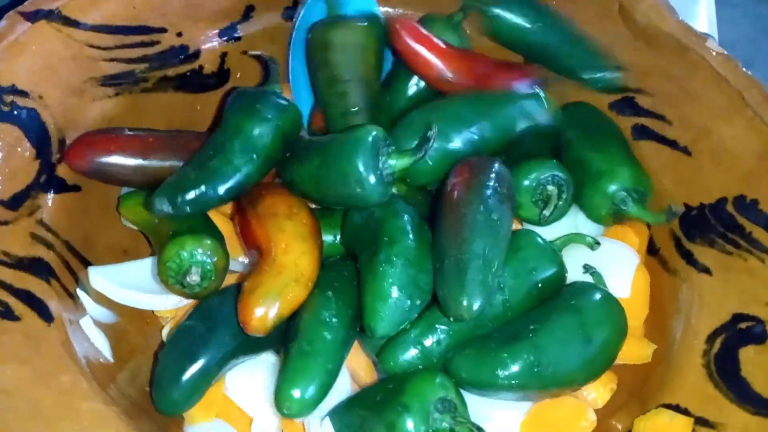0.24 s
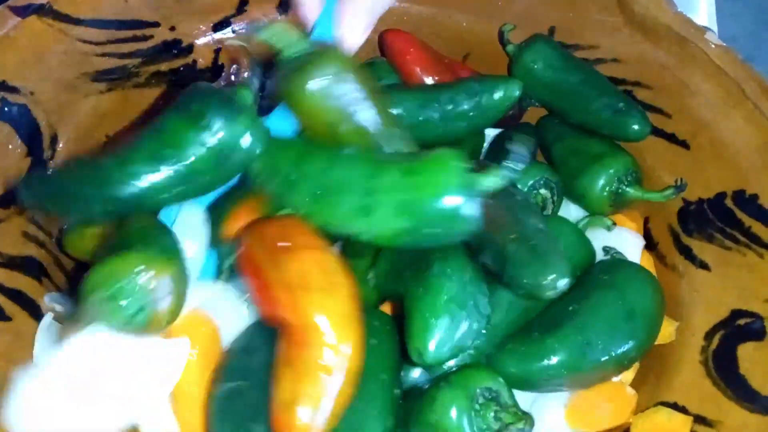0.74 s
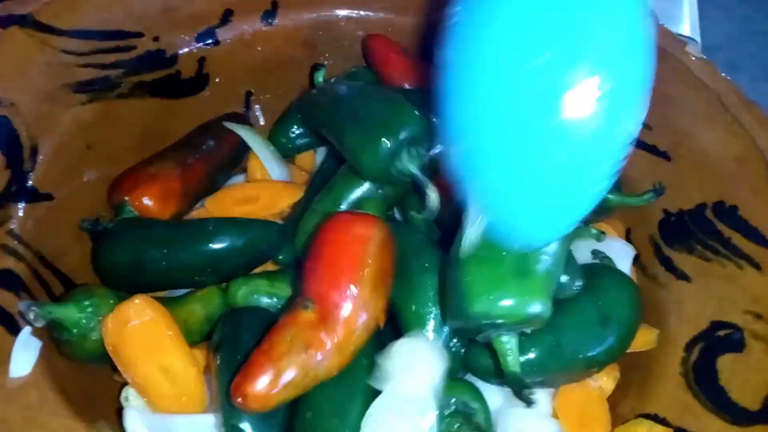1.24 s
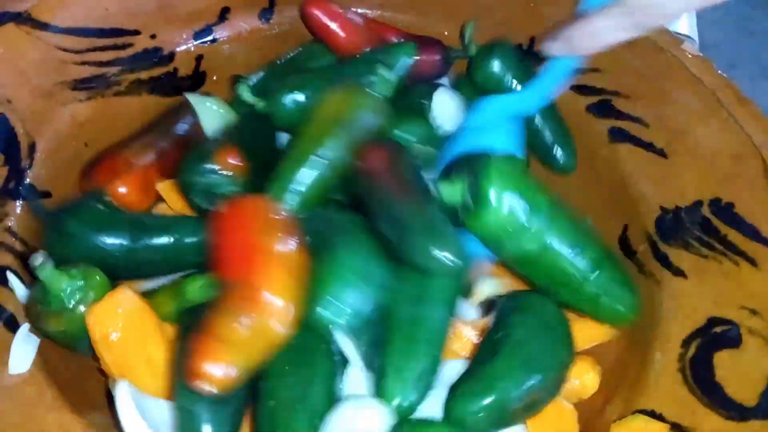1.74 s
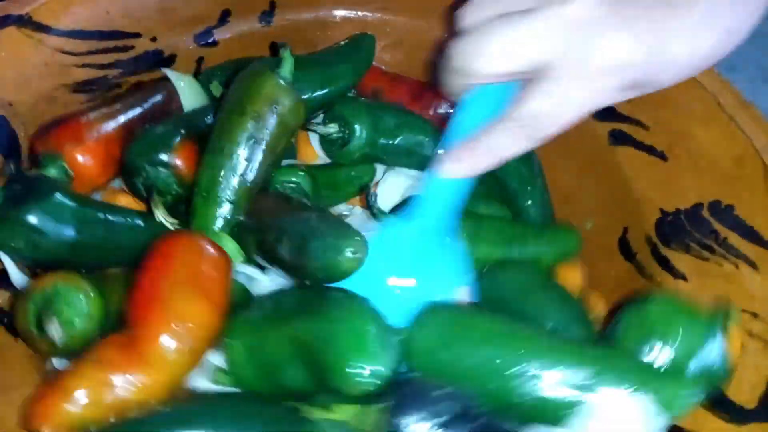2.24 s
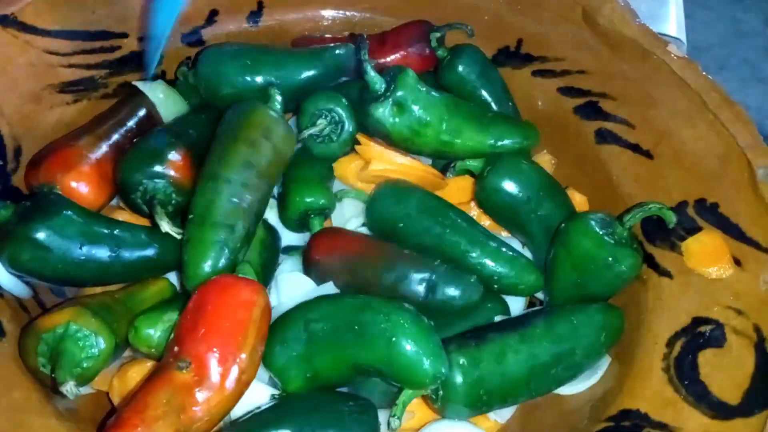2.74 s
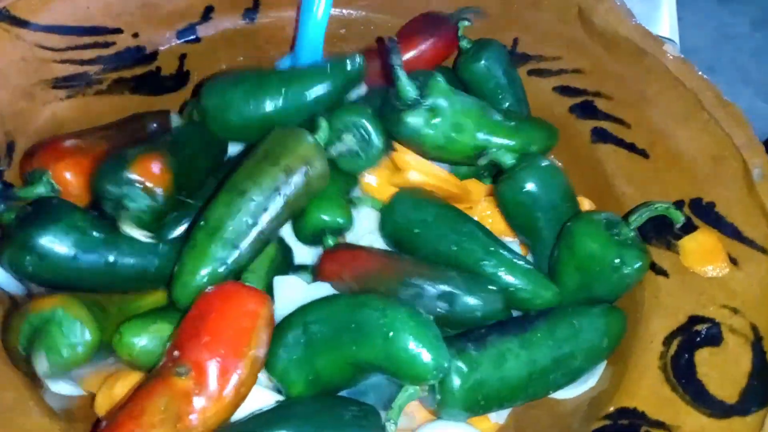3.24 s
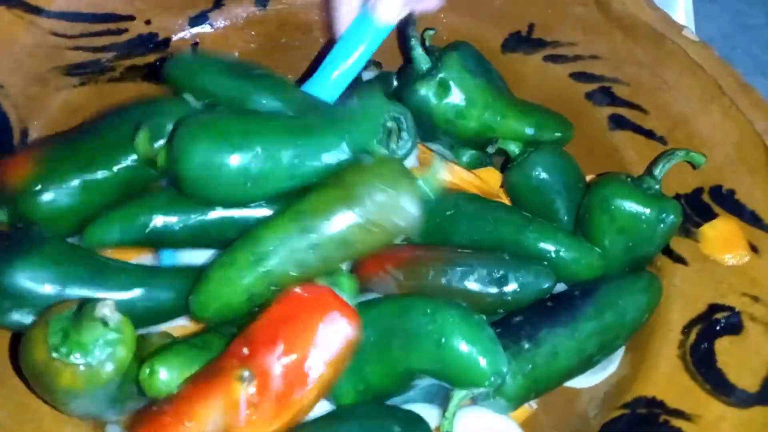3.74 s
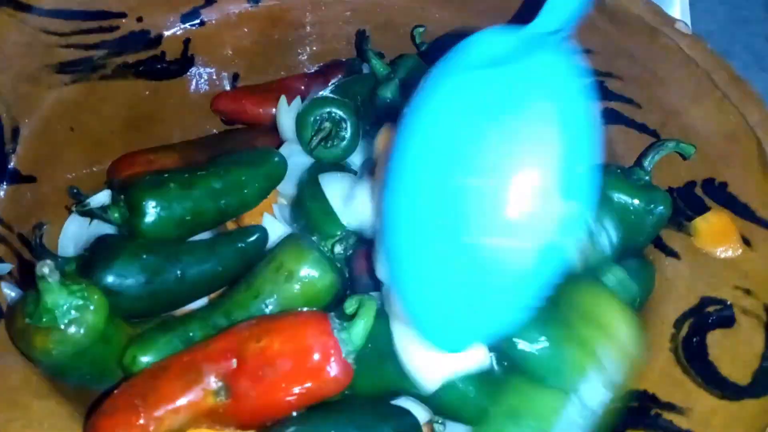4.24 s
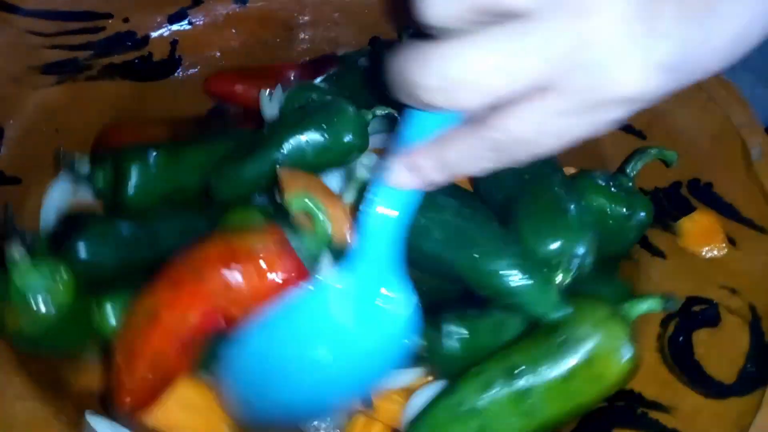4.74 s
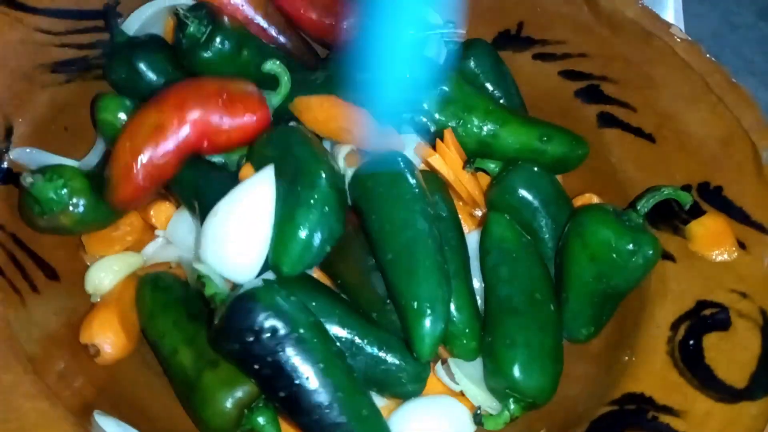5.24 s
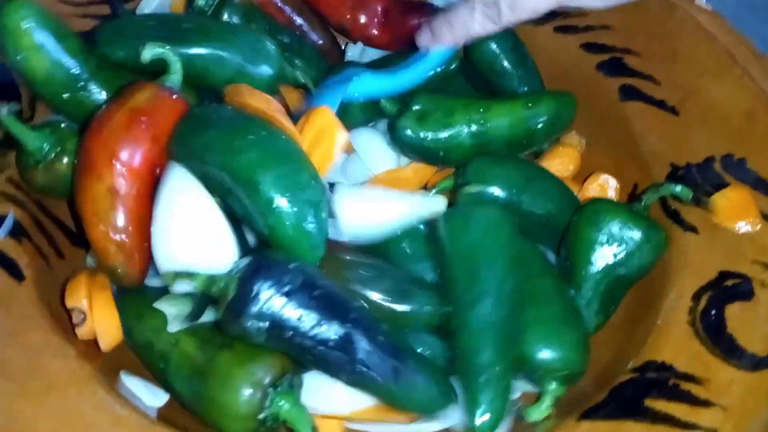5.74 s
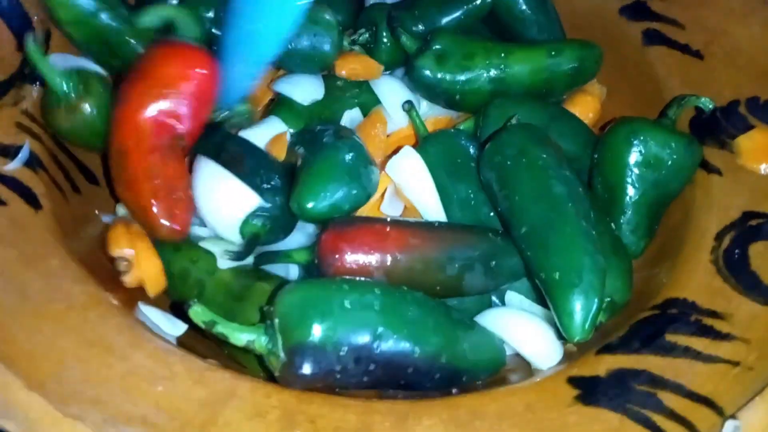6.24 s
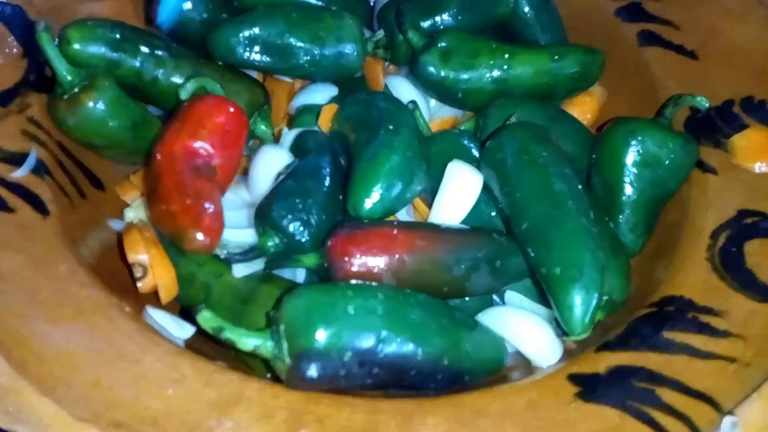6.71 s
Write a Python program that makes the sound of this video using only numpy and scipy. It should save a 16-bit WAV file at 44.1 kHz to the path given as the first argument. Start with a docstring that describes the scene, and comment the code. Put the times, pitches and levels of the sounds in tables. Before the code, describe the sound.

Peppers and onions sizzle gently in a clay pot while a plastic spoon knocks and scrapes the wall, with oil spitting close by.

```python
"""Vegetables frying in a clay pot

Whole peppers, onion and carrot sizzle gently in a wide clay pot on a kitchen stove, close to the microphone.
Frying and burner are random impulses and noise through coloured filters; steam bubbles are decaying sines.
Oil spits, bumps and thuds are short decaying bursts. A plastic spoon knocks on the clay and scrapes along it
in stick-slip strokes: trains of random impulses exciting the pot's resonances, with brief squeaks of one pitch."""
import sys
import numpy as np
from scipy import signal
from scipy.fft import rfft, irfft, next_fast_len
from scipy.io import wavfile
from scipy.ndimage import uniform_filter1d, map_coordinates

SR = 44100
rng = np.random.default_rng(int(sys.argv[2]) if len(sys.argv) > 2 else 0)


def output_pcm(signal):
    """Save a mono or channel-first signal as 16-bit PCM at the path in sys.argv[1].

    Samples are clipped to [-1, 1] before scaling.
    """
    pcm = np.clip(np.atleast_2d(signal).T, -1, 1) * 32767
    wavfile.write(sys.argv[1], SR, np.round(pcm).astype(np.int16))


N = 307597  # length in samples

# Reverberation of the kitchen. Each row: frequency in Hz, t60 in seconds.
KITCHEN_DECAY = [(150, 0.16), (2000, 0.35), (14000, 0.52)]
# Colours of the burner and pot rumble, the tumbling vegetables, the boiling and the fine spray.
# Each row: frequency in Hz, relative gain in dB.
BURNER_COLOUR = [(15, -59), (25, -34), (43, -5.5), (75, -7.5), (108, 0.5), (156, -5.5), (188, -14.5),
                 (243, -4), (299, -12.5), (344, -12.5), (400, -29.5), (520, -12.5), (880, -120)]
TUMBLE_COLOUR = [(150, -35), (280, -2), (420, -1.5), (850, 0.5), (1300, -0.5), (2500, -23.5)]
SIZZLE_COLOUR = [(300, -25), (600, -12), (950, -4.5), (1300, -3), (1750, 1), (2300, 4), (2750, 2.5),
                 (3700, -6.5), (4600, -12.5), (5700, -4.5), (6500, -5), (7800, -21.5), (10000, -53)]
SPRAY_COLOUR = [(4000, -64), (6300, 1), (8000, -9.5), (9800, 0), (11500, -1.5), (13500, -6), (15000, 0),
                (16000, 10)]
# The heap turns over and rocks the pot.
# Each row: time of its height in seconds, half length in seconds, sliding in dB, rumble in dB.
TURNS = [(0.373, 0.14, -40.5, -39.5), (0.944, 0.25, -47.5, -48), (1.705, 0.11, -35.5, -42.5),
         (2.2, 0.44, -38, -57), (3.11, .1, -40, -62), (4.21, 0.37, -50, -49), (4.924, 0.11, -36.5, -52),
         (5.857, 0.16, -39.5, -60), (6.902, 0.056, -44, -42)]
# The frying flares up after each stir and calms down again.
# Each row: time in seconds, sizzle level in dB, fine spray level in dB.
FRYING_LEVELS = [(0.0, -40, -38), (0.5, -31.5, -33), (0.8, -36.5, -33.5), (1.55, -40.5, -41),
                 (2.1, -40, -34.5), (2.42, -34.5, -28.5), (2.88, -41, -38.5), (3.32, -33.5, -30),
                 (3.69, -41.5, -39.5), (4.19, -39, -40.5), (4.62, -41.5, -45), (4.99, -34.5, -34),
                 (5.3, -39.5, -36.5), (5.65, -39, -35), (6.2, -41, -39), (6.6, -38, -38), (6.97, -41, -36)]
# Dull thuds of the heavy pot. Each row: start in seconds, level of the low push in dB, frequency in Hz, t60 in seconds.
THUDS = [(1.58, -15, 167, 0.022), (2.123, -12, 102, 0.02)]
# Peppers drop on each other and on the pot. Each row: start in seconds, loudest level in dB, pitch in Hz.
BUMPS = [(0.235, -34, 729), (1.401, -41, 899), (4.003, -34.5, 676), (4.313, -36.5, 830), (5.104, -37, 755),
         (6.046, -31, 590)]
# The loudest spits of oil and snaps of pepper skin.
# Each row: start in seconds, loudest level in dB, centre in Hz.
LOUD_SPITS = [(0.135, -31, 3180), (0.557, -19.5, 5300), (1.068, -25.5, 6000), (1.148, -24, 2180),
              (1.172, -26, 2490), (1.914, -23, 14500), (2.124, -21.5, 12500), (2.251, -23, 13000),
              (3.778, -29, 2470), (4.024, -30, 13460), (5.143, -25.5, 3000), (5.162, -21.5, 2530),
              (6.096, -30, 9800), (6.477, -27.5, 3450), (6.535, -23.5, 1690), (6.637, -33, 10900),
              (6.934, -24.5, 3400)]
# Resonances of the clay pot. Each row: frequency in Hz, half width at half amplitude in Hz, relative level in dB.
POT_MODES = [(477, 48, -10), (716.7, 19, -1.5), (855, 43, 1.5), (935.6, 32, 1), (1113, 15, 0),
             (1395, 93, -8), (1635, 38, 7), (1811, 68, 4.5), (2120, 260, 0), (2282, 7.7, 5),
             (2484, 52, -0.5), (2620, 144, -2), (3152, 21, -7), (3520, 71, -12), (3750, 45, -10),
             (5470, 97, -13.5), (6380, 270, -17.5), (6970, 150, -22.5), (9090, 200, -18),
             (11700, 210, -34.5), (11500, 450, -22), (13900, 290, -26.5)]
# The dense, well damped response between those modes. Each row: frequency in Hz, relative gain in dB.
CLAY_RESPONSE = [(40, -37), (120, -40), (400, -20.5), (700, -14), (1250, -9.5), (2800, -7.5), (3900, -19),
                 (6300, -16.5), (8000, -27.5), (10500, -19), (13600, -26), (15500, -12.5)]
# The spoon's edge squeaks; the first row is instead a high ring of the hard knock at 1.578 s. Each row: start
# in seconds, length in seconds, pitch in Hz, peak level in dB.
SQUEAKS = [(1.574, 0.019, 9240, -24), (1.591, 0.089, 3570, -22.5), (2.904, 0.014, 10600, -17.5),
           (2.906, 0.059, 9200, -27), (2.898, 0.041, 15000, -24), (2.994, 0.081, 8740, -28),
           (3.028, 0.054, 14700, -23)]
# The spoon strikes the clay; depth and grit are relative to the middle register. Each row: start in seconds,
# loudest level in dB, depth in dB, grit in dB, chatter t60 in seconds, favoured frequency in Hz.
KNOCKS = [(0.305, -5, -16, -8, 0.016, 1510), (0.391, -12, -15, -11, 0.014, 2580),
          (0.618, -14, -11.5, -1, 0.04, 2860), (1.578, 0, -12.5, -14, 0.049, 2360),
          (1.763, -5, -14, -12, 0.051, 2180), (2.053, -21.5, 11, -21, .03, 900),
          (2.228, -26, -6, 3, .03, 1850), (2.315, -10, -10.5, -18.5, 0.071, 1900),
          (2.464, -18, -3, -15, .06, 1630), (2.905, -9.5, -13, -2, 0.072, 2660),
          (3.061, -13.5, -4, 3.5, 0.023, 1700), (3.221, -23.5, -11, -10, 0.027, 1660),
          (5.641, -7.5, 5, -14.5, 0.09, 1030), (5.665, -15.5, 14, -29, 0.027, 850),
          (5.778, -9, 5.5, -17, 0.044, 1630)]
# Strokes of the spoon along the clay; the place of contact favours one resonance.
# Each row: start in seconds, swell in seconds, release in seconds, peak force in dB,
# depth and grit in dB relative to the middle register, favoured frequency in Hz, its boost in dB.
STROKES = [(0.315, 0.1, 0.061, -17.5, -9, -5.5, 2666, 16.5), (0.455, 0.022, 0.23, -24.5, -7.5, -7, 1600, 5),
           (0.62, 0.017, 0.056, -20, -11, -1, 2820, 13), (1.585, 0.0037, 0.15, -13, -5, -17.5, 966, 15),
           (1.68, 0.034, 0.056, -29.5, -23, 8, 2300, 15), (1.773, 0.11, 0.025, -12.5, -3.5, -8, 1600, 9),
           (1.93, 0.062, 0.066, -22.5, 3.5, -4.5, 1135, 10),
           (2.04, 0.049, 0.0078, -25.5, -1.5, -4, 1110, 7),
           (2.14, 0.035, 0.017, -25.5, -2.5, -13, 2330, 10), (2.225, 0.034, 0.044, -26, -4.5, -11, 1850, 1),
           (2.335, .088, 0.029, -15.5, -10, -11, 2140, 8.5),
           (2.464, 0.0058, 0.042, -17, -6.5, -15, 1710, 13),
           (2.905, 0.036, 0.044, -18.5, -8, -6.5, 2590, 14),
           (2.965, 0.085, 0.058, -18.5, -12.5, -3, 2060, 8), (3.214, 0.055, 0.06, -20, -12, -9.5, 1650, 7),
           (3.33, 0.071, 0.4, -38, -1.5, -11, 850, 7), (4.816, 0.024, 0.082, -25, -12, -5, 690, 18),
           (4.89, 0.029, 0.12, -25, -6.5, -8, 1850, 3), (5.659, 0.0054, 0.063, -20, 2, -13, 850, -3),
           (5.78, 0.0035, 0.052, -16.5, -8, -24, 1590, 17), (5.816, 0.13, 0.033, -19.5, 5, -10, 845, 7.5)]

SWELL_DB, RELEASE_DB = 10.5, 20.5  # rise of force as the spoon digs in, fall as it lifts
SETTLING_DB, BURNER_DB = -53.5, -49  # the vegetables at rest; the steady flame
SPITS_PER_S, SMALL_SPIT_DB, SMALL_SPIT_HZ = 4, -35, 5600  # small spits: rate, middle level, middle pitch
TOP_HZ = 15900  # band limit


def amp(db):
    """Logarithmic level: decibels to amplitude gain."""
    return 10 ** (np.asarray(db) / 20)


def unit(x):
    """Normalisation by mean power: x at rms 1."""
    return x / np.sqrt(np.mean(x ** 2) + 1e-20)


def crest(x, size=128):
    """Normalisation by peak short-time power: the loudest few milliseconds of x at rms 1."""
    power = uniform_filter1d(x ** 2, size, mode="constant")
    return x / np.sqrt(power.max() + 1e-20)


def along(points, hz):
    """Logarithmic frequency scale: values read between (Hz, value) points."""
    f, value = np.transpose(points)
    return np.interp(np.log(hz + 1), np.log(f + 1), value)


def seconds(length):
    """Sampled time: an axis of the given length in seconds."""
    return np.arange(int(length * SR)) / SR


def add(track, s, x):
    """Superposition: mix x into the track at time s."""
    part = track[max(round(s * SR), 0):][:len(x)]
    part += x[:len(part)]


def wobble(rate, n):
    """Slow random modulation: a smooth curve through rate random knots a second."""
    knots = rng.standard_normal(int(n * rate / SR) + 4)
    return map_coordinates(knots, [np.arange(n) * rate / SR], order=2)


def filtered(x, gain):
    """Zero-phase filtering: the spectrum is multiplied by a real gain of frequency."""
    m = next_fast_len(len(x) + 8192)
    return irfft(rfft(x, m) * gain(np.fft.rfftfreq(m, 1 / SR)), m)[:len(x)]


def ring(x, gain, size=8192):
    """Minimum-phase filtering: a folded cepstrum gives the causal response with this gain of frequency."""
    cepstrum = irfft(np.log(gain(np.fft.rfftfreq(size, 1 / SR)) + 1e-6))
    cepstrum[1:size // 2] *= 2
    cepstrum[size // 2 + 1:] = 0
    response = irfft(np.exp(rfft(cepstrum)))[:size // 2]
    return signal.fftconvolve(x, response)[:len(x)]


def crackle(n, rate, spread_db):
    """Shot noise: random impulses, on average rate a second, with sizes spread in dB; rms 1."""
    size = amp(spread_db * np.minimum(rng.standard_normal(n), 2.5))
    sign = rng.choice([-1, 1], n)
    present = rng.random(n) < rate / SR
    return unit(size * sign * present)


def grains(spectrum, rate, spread_db, hiss_db, flutter_db, flutter_rate):
    """Clumped shot noise: countless tiny bursts over a hiss, fluttering in level and coloured; rms 1."""
    bursts = crackle(N, rate, spread_db) + amp(hiss_db) * rng.standard_normal(N)
    fluttering = bursts * amp(flutter_db * wobble(flutter_rate, N))
    return unit(ring(fluttering, lambda f: amp(along(spectrum, f))))


def kitchen(x, delay=0.006):
    """Reverberation: convolution with a noise tail that decays later in the treble than in the middle."""
    hz, t, z = signal.stft(rng.standard_normal(SR // 2), SR, nperseg=256)
    decay = amp(-60 * t / along(KITCHEN_DECAY, hz)[:, None])
    tail = signal.istft(z * decay, SR, nperseg=256)[1]
    delayed = np.pad(x, (int(delay * SR), 0))
    return signal.fftconvolve(delayed, tail / np.linalg.norm(tail))[:N]


def heap_motion(resting_db, heights_db):
    """Addition of powers: each turn of the heap swells and dies away over the resting level; a gain."""
    t = np.arange(N) / SR
    power = amp(resting_db) ** 2
    for (s, half_length, *_), height_db in zip(TURNS, heights_db):
        motion = np.exp(-((t - s) / half_length) ** 2)
        power = power + (amp(height_db) * motion) ** 2
    return np.sqrt(power)


def burner():
    """Low-frequency noise: the steady flame, with the rumble of the pot rocked by each turn of the heap."""
    rumble = heap_motion(BURNER_DB, [row[3] for row in TURNS])
    return rumble * grains(BURNER_COLOUR, rate=300, spread_db=3.5, hiss_db=1, flutter_db=3, flutter_rate=11.0)


def tumbling():
    """Friction noise: wet vegetables slide over each other, loudest as the heap turns."""
    slide = heap_motion(SETTLING_DB, [row[2] for row in TURNS])
    return slide * grains(TUMBLE_COLOUR, rate=250, spread_db=8.5, hiss_db=-0.5, flutter_db=4.5, flutter_rate=25)


def bubbles(rate=90, centre_hz=3800, octaves=0.79, cycles=9, spread_db=0.5):
    """Damped bubble resonance: steam bubbles pop in the oil as decaying sines, each at its own pitch; rms 1."""
    count, t = int(rate * N / SR), seconds(0.017)
    when, pitch, size = rng.random((count, 3)).T[:, :, None]
    hz = centre_hz * 2 ** (octaves * 2 * (pitch - 0.5))
    strength = amp(-spread_db * np.log(size + 0.025))
    pops = strength * np.sin(2 * np.pi * hz * t) * np.exp(-hz * t / cycles)
    at = (when * N).astype(int) + np.arange(len(t))
    return unit(np.bincount(at.ravel(), pops.ravel(), N)[:N])


def frying(bubbles_db=-17.5):
    """Boiling noise: water boils out in the oil with popping bubbles, and fine spray crackles above it."""
    s, sizzle_db, spray_db = np.transpose(FRYING_LEVELS)
    t = np.arange(N) / SR
    boiling = grains(SIZZLE_COLOUR, rate=1500, spread_db=2.0, hiss_db=-0.5, flutter_db=2.0, flutter_rate=45)
    spray = grains(SPRAY_COLOUR, rate=140, spread_db=9, hiss_db=5, flutter_db=1.5, flutter_rate=72)
    sizzle = boiling + amp(bubbles_db) * bubbles()
    return amp(np.interp(t, s, sizzle_db)) * sizzle + amp(np.interp(t, s, spray_db)) * spray


def thuds(slap_db=-8, slap_hz=450, slap_t60=0.012):
    """Damped low oscillation: one low push of the heavy pot with a muffled slap of noise."""
    out, t = np.zeros(N), seconds(0.2)
    for s, db, hz, t60 in THUDS:
        push = -np.sin(2 * np.pi * hz * t) * amp(-60 * t / t60)
        burst = rng.standard_normal(len(t)) * amp(-60 * t / slap_t60)
        slap = ring(burst, lambda f: 1 / (1 + (f / slap_hz) ** 2))
        add(out, s, amp(db) * (push + amp(slap_db) * crest(slap)))
    return out


def bumps(t60=0.056, flesh_db=-8, flesh_hz=300):
    """Broad resonance of a soft body: peppers give a brief hollow bump over the dull thump of their flesh."""
    out, t = np.zeros(N), seconds(0.1)
    for s, db, hz in BUMPS:
        touch = rng.standard_normal(len(t)) * amp(-60 * t / t60)

        def colour(f):
            hollow = 1 / (1 + (2 * np.log2((f + 1) / hz)) ** 2)
            return hollow + amp(flesh_db) / (1 + (f / flesh_hz) ** 2)
        add(out, s, amp(db) * crest(ring(touch, colour)))
    return out


def small_spits(spread_db=4, octaves=1.0):
    """Random arrivals: rows of start in seconds, loudest level in dB and centre in Hz for chance droplets."""
    when, size, pitch = rng.random((int(SPITS_PER_S * N / SR), 3)).T
    db = SMALL_SPIT_DB + spread_db * (2 * size - 1)
    hz = SMALL_SPIT_HZ * 2 ** (octaves * (2 * pitch - 1))
    return list(zip(when * N / SR, db, hz))


def spits(t60=0.014, snap=3, octaves=0.9, skirt_db=-18, sheen_db=7, sheen_hz=15500, sheen_width_hz=1500):
    """Impulsive burst: a droplet gives a sharp snap and a puff of noise around its pitch, with a top sheen."""
    out, t = np.zeros(N), seconds(0.05)
    for s, db, hz in list(LOUD_SPITS) + small_spits():
        burst = rng.standard_normal(len(t)) * amp(-60 * t / t60)
        burst[0] += snap

        def colour(f):
            puff = np.exp(-(np.log2((f + 1) / hz) / octaves) ** 2) + amp(skirt_db)
            bass_cut = f ** 2 / (f ** 2 + 1000 ** 2)
            sheen = amp(sheen_db * np.exp(-((f - sheen_hz) / sheen_width_hz) ** 2))
            return puff * bass_cut * sheen
        add(out, s, amp(db) * crest(ring(burst, colour)))
    return out


def pot(push, depth_db, grit_db, favoured_hz, boost_db, scatter_db=4.0, favoured_width_hz=85,
        ripple_db=4, ripple_hz=100):
    """Modal response: the pot answers a push with its resonances, weighed anew at every contact."""
    hz = np.fft.rfftfreq(8192, 1 / SR)
    strengths = rng.normal(0, scatter_db, len(POT_MODES))
    modes_power = sum(amp(db + strength) ** 2 / (1 + ((hz - f) / width) ** 2) ** 2
                      for (f, width, db), strength in zip(POT_MODES, strengths))
    place = amp(boost_db * np.exp(-((hz - favoured_hz) / favoured_width_hz) ** 2 / 2))
    # the crowded high modes of spoon and clay stand out differently at each place
    ripple = map_coordinates(rng.standard_normal(1024), [hz / ripple_hz], order=3)
    crowded = amp(ripple_db * np.minimum(hz / 3500, 1) * ripple)
    gain = np.sqrt(modes_power + amp(along(CLAY_RESPONSE, hz)) ** 2) * place * crowded
    # a flat, heavy contact drives the deep register, the spoon's edge the gritty one
    below_middle, below_grit = (1 / (1 + (hz / edge_hz) ** 16) for edge_hz in (1300, 4300))
    wall = 1 / (1 + (600 / (hz + 1)) ** 4)  # the stiff wall radiates little bass
    deep = unit(gain * below_middle * wall)
    middle = unit(gain * (below_grit - below_middle))
    gritty = unit(gain * (1 - below_grit))
    response = amp(depth_db) * deep + middle + amp(grit_db) * gritty
    return ring(push, lambda f: response)


def squeaks(waver=0.008):
    """Periodic stick-slip: for a moment the slips lock to one slightly wavering pitch; a hard knock leaves a
    like thin ring."""
    out = np.zeros(N)
    for s, length, hz, db in SQUEAKS:
        t = seconds(length)
        wavering_hz = hz * (1 + waver * wobble(384, len(t)))
        phase = 2 * np.pi * np.cumsum(wavering_hz) / SR
        add(out, s, amp(db) * np.hanning(len(t)) * np.sin(phase))
    return out


def knocks(blow=5, boost_db=4):
    """Impact excitation: a blow of the spoon, then its quickly dying chatter, rings the pot."""
    out, t = np.zeros(N), seconds(0.24)
    for s, db, depth_db, grit_db, t60, favoured_hz in KNOCKS:
        push = crackle(len(t), rate=6000, spread_db=3.5) * amp(-60 * t / max(t60, 0.004))
        push[0] += blow
        add(out, s, amp(db) * crest(pot(push, depth_db, grit_db, favoured_hz, boost_db)))
    return out


def scrapes(slip_rate=2200, spread_db=2.0, judder_db=2, judder_rate=150, fade=0.0028):
    """Stick-slip friction: random slips over rough clay, digging in and lifting off, drive the ringing pot."""
    out = np.zeros(N)
    for start, swell, release, db, depth_db, grit_db, favoured_hz, boost_db in STROKES:
        t = seconds(swell + release + 2 * fade)
        judder = amp(judder_db * wobble(judder_rate, len(t)))
        slips = unit(crackle(len(t), slip_rate, spread_db) * judder)
        contact = np.clip(np.minimum(t, t[-1] - t) / fade, 0, 1)
        force_db = db + np.interp(t, [0, swell, swell + release], [-SWELL_DB, 0, -RELEASE_DB])
        push = slips * contact * amp(force_db)
        room_to_ring = np.pad(push, (0, SR // 10))
        add(out, start, pot(room_to_ring, depth_db, grit_db, favoured_hz, boost_db))
    return out


def scene():
    """Superposition of sources: spoon, vegetables and spits with their reverberation, over the frying."""
    background = burner() + tumbling() + frying()
    stirring = thuds() + bumps() + spits() + squeaks() + knocks() + scrapes()
    return (background + stirring + amp(-13.5) * kitchen(stirring))[None]


def record(dry, low_cut_hz=60):
    """Band limiting and saturation: a small microphone loses deep bass, rounds off peaks and ends at TOP_HZ."""
    low_cut = signal.butter(2, low_cut_hz, "highpass", fs=SR, output="sos")
    heard = signal.sosfilt(low_cut, dry[0])
    clipped = heard / (1 + np.abs(heard) ** 8) ** (1 / 8)
    return filtered(clipped, lambda hz: hz < TOP_HZ)[None]


dry = scene()
out = record(dry)
output_pcm(out)
```